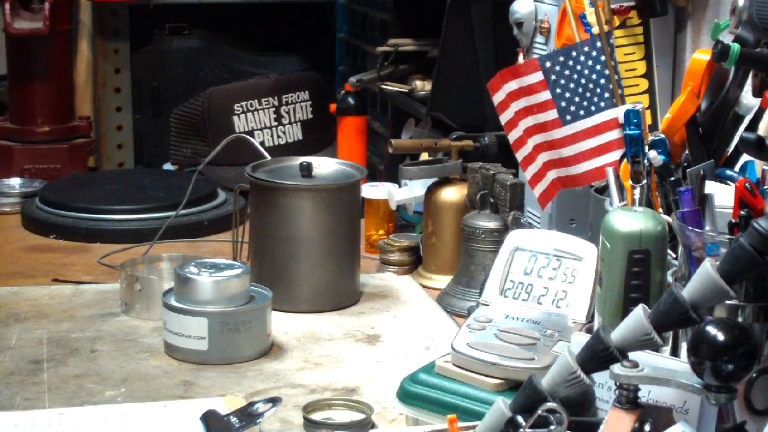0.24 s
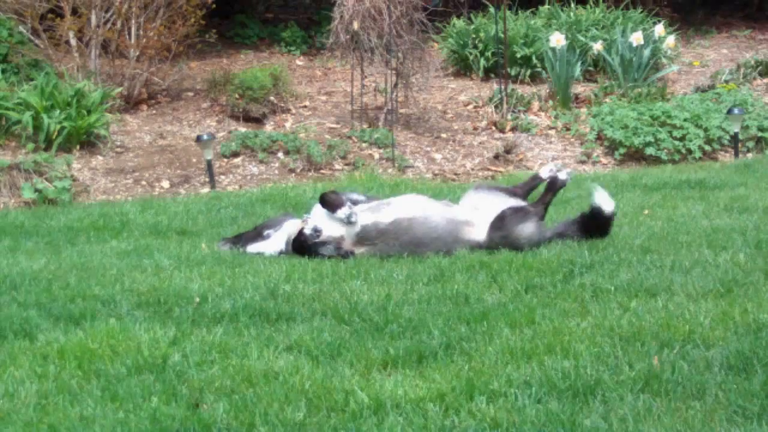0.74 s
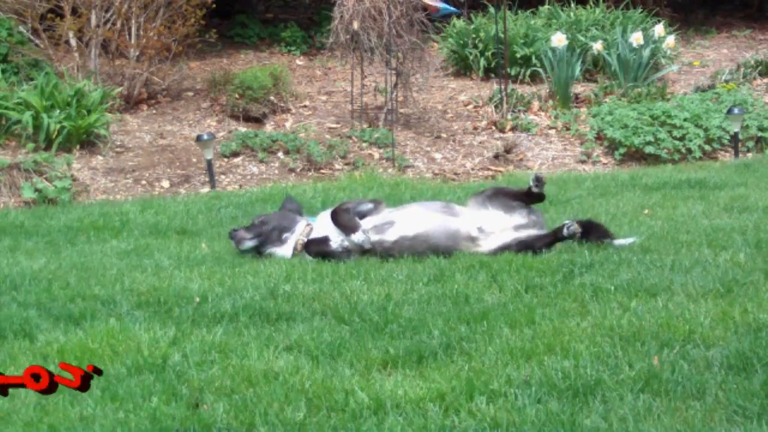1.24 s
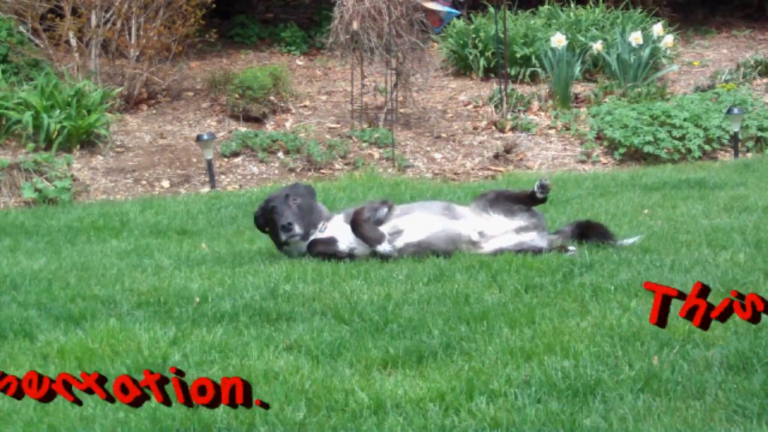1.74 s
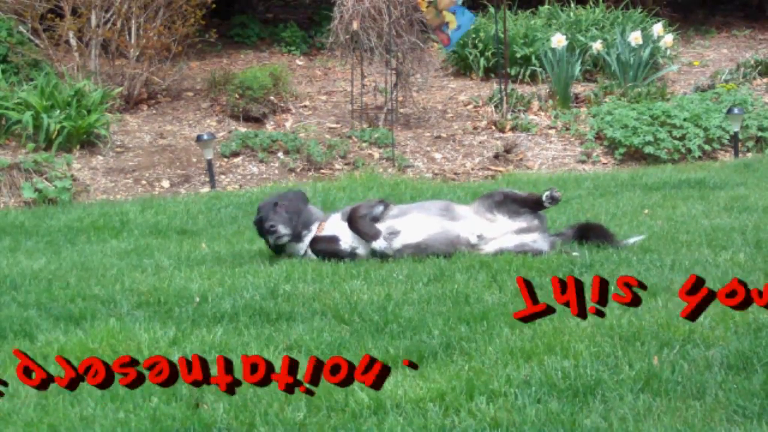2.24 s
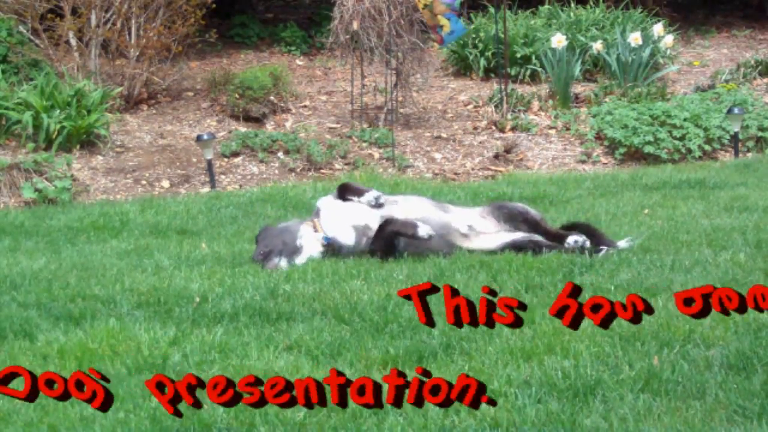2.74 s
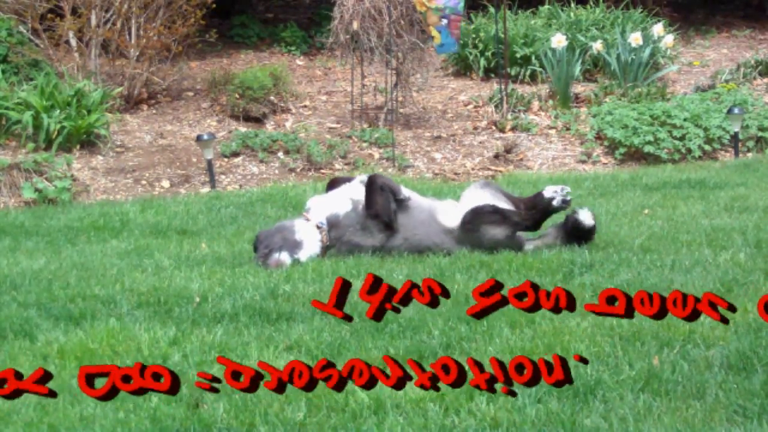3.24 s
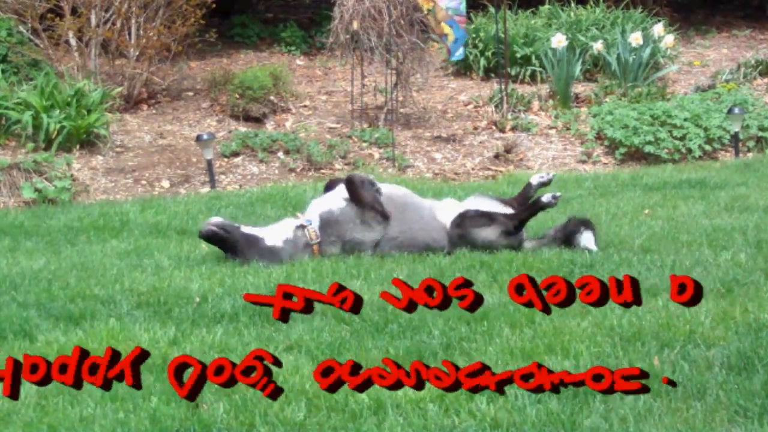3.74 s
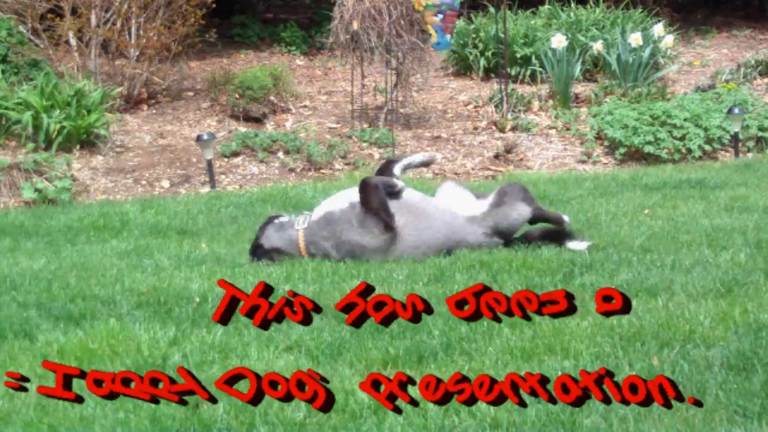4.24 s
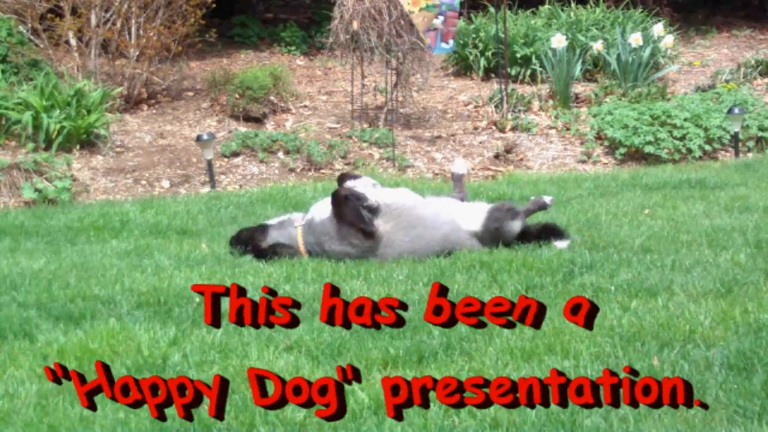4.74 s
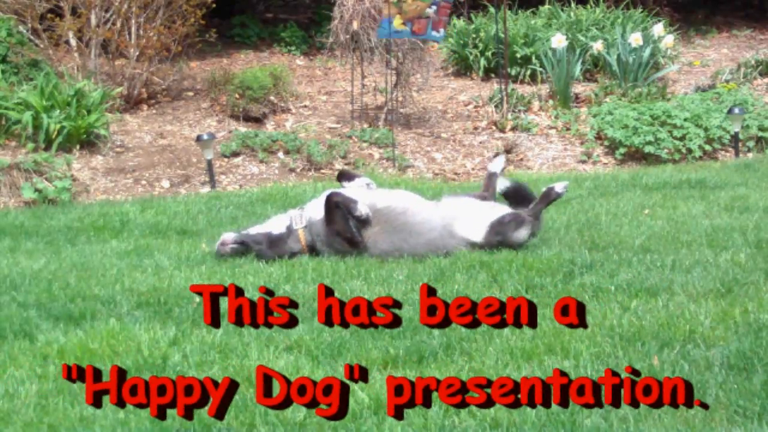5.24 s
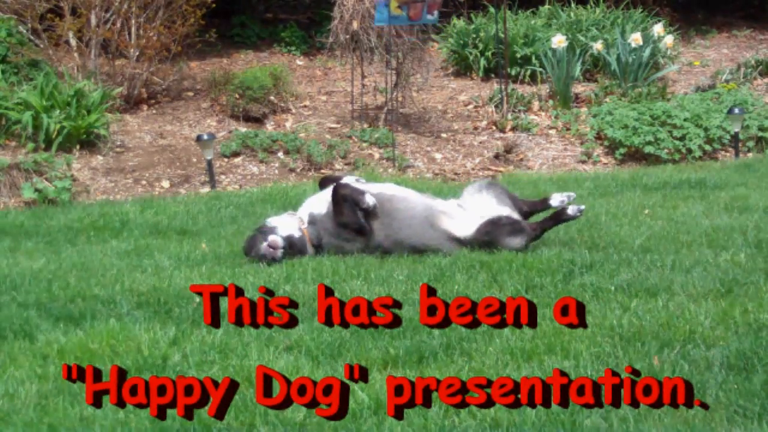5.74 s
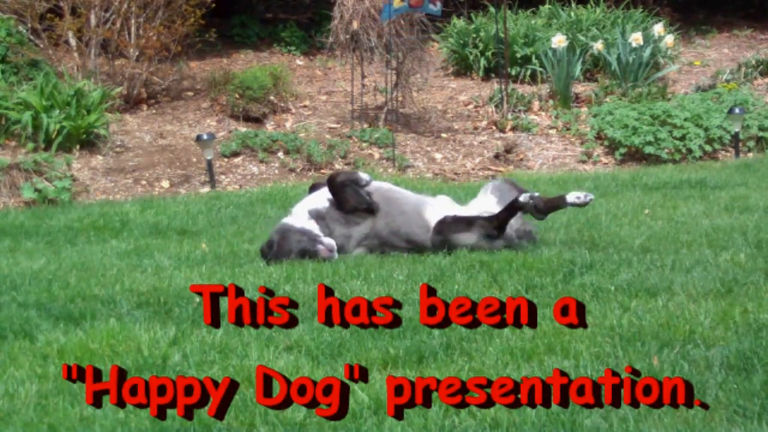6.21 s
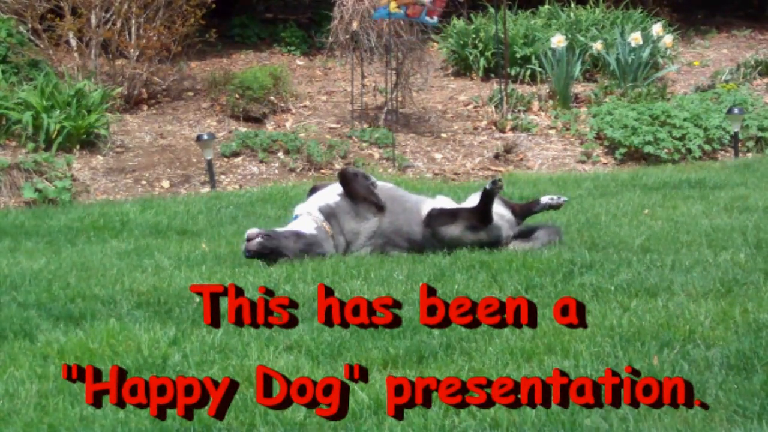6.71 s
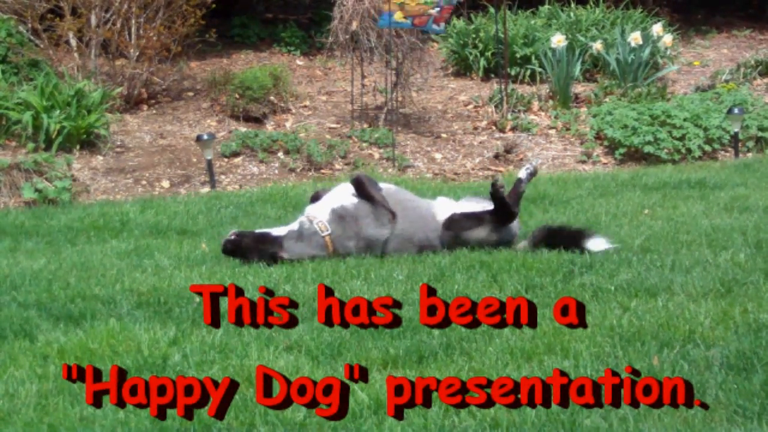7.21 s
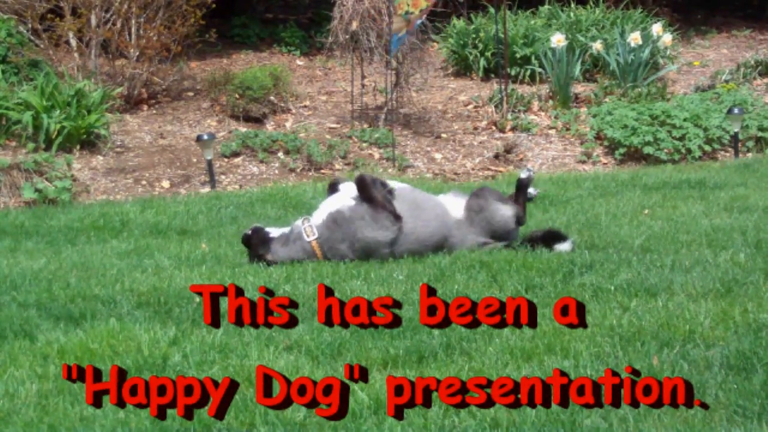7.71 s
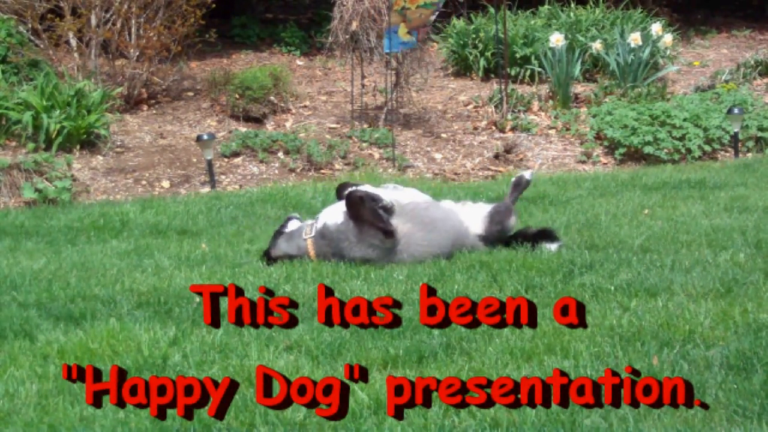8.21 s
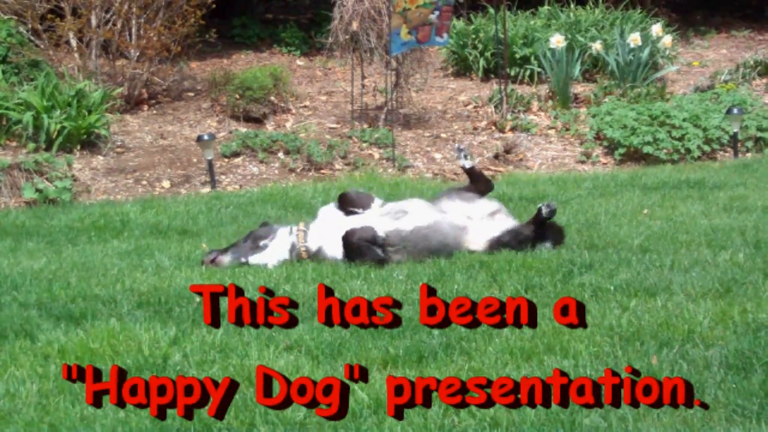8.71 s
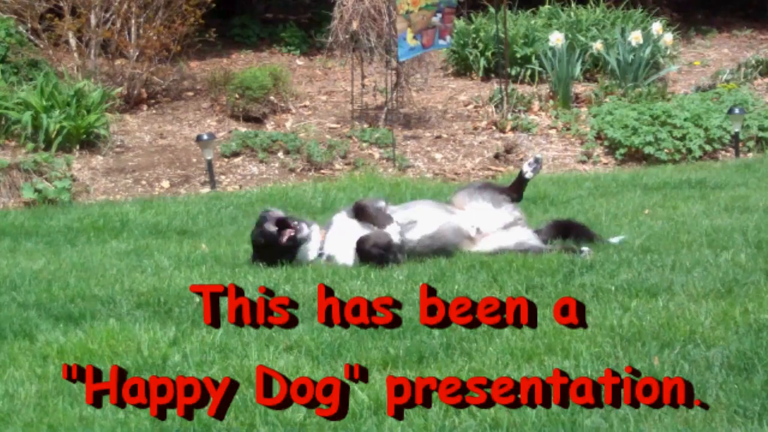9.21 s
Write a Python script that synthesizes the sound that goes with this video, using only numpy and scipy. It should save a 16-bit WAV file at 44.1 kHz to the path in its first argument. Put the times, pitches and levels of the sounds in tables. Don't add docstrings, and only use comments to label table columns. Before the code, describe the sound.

Indoors, a dull bass-heavy fan hum plays briefly in the centre. After a tiny gap and splutter the sound opens into wide stereo outdoors: many small songbirds, mostly near three kilohertz, gliding, chirping, scraping hoarsely and trilling in irregular overlapping bursts. Distant birds blur into a murmur, faint twig ticks come early, and diffuse reflections trail each call over a light bass-free hiss.

```python
import sys
import numpy as np
from scipy import signal
from scipy.fft import rfft, irfft, next_fast_len
from scipy.io import wavfile
from scipy.ndimage import uniform_filter1d

SR = 44100
rng = np.random.default_rng(int(sys.argv[2]) if len(sys.argv) > 2 else 0)


def nominal_scale(level):
    x = np.asarray(level, float) / 20
    return 10 ** x


def dump_mix(stems):
    frames = np.atleast_2d(stems).T
    limited = np.clip(frames, -1, 1)
    pcm = np.round(limited * 32767).astype(np.int16)
    wavfile.write(sys.argv[1], SR, pcm)


N = 417186
SHOP_END_S, GARDEN_START_S = .8429, .866


def wobble(rate_hz, size):
    hold = max(int(SR / rate_hz), 1)
    steps = np.repeat(rng.standard_normal(size // hold + 1), hold)
    return 1.252 * uniform_filter1d(steps, hold)[:size]


def sing(notes, rough, flutter_db, overtones_db, fade_s, half_db=-99, fall_db_s=0):
    out = np.zeros(N + SR)
    shake, flutter = wobble(900, N + SR), wobble(160, N + SR)
    for start_s, length_s, from_hz, middle_hz, to_hz, level_db in notes:
        edge = fade_s / length_s
        u = np.arange(-edge * length_s * SR / 2, (1 + edge / 2) * length_s * SR) / SR / length_s
        first = int((start_s - fade_s / 2) * SR)
        at = slice(first, first + len(u))
        hz = from_hz * (1 - u) * (1 - 2 * u) + 4 * middle_hz * u * (1 - u) + to_hz * u * (2 * u - 1)
        phase = 2 * np.pi * np.cumsum(hz * (1 + rough * shake[at])) / SR
        own = nominal_scale(flutter_db * (flutter[at][::-1] - flutter[at]))
        overtones = sum(nominal_scale(g) * np.sin((k + 2) * phase) for k, g in enumerate(overtones_db))
        tone = np.sin(phase) + own * overtones
        tone = tone + nominal_scale(half_db) * (np.sin(3 * phase / 2) + nominal_scale(-4) * np.sin(5 * phase / 2))
        ramp = np.clip(np.minimum(u + edge / 2, 1 + edge / 2 - u) / edge, 0, 1)
        fade = np.sin(np.pi / 2 * ramp) ** 2
        loudness = nominal_scale(level_db - fall_db_s * length_s * u + flutter_db * flutter[at])
        out[at] += np.sqrt(2) * loudness * fade * tone
    return out[:N]


def held(rows):
    sag = .012
    return [(s, length, hz * (1 + sag / 2), hz, hz * (1 - sag / 2), db) for s, length, hz, db in rows]


def slides(rows, halfway=.5):
    return [(s, length, a, a + halfway * (b - a), b, db) for s, length, a, b, db in rows]


def turns(rows):
    return [(s, length, ends, middle, ends, db) for s, length, ends, middle, db in rows]


def shaped(x, points):
    hz, db = np.transpose(points)
    size = next_fast_len(N)
    log_hz = np.log(np.arange(size // 2 + 1) * SR / size + 1)
    gain = nominal_scale(np.interp(log_hz, np.log(hz), db))
    return irfft(rfft(x, size) * gain, size)[..., :N]


def coloured(points):
    return shaped(rng.standard_normal(N), points)


def level(x, db):
    return x * nominal_scale(db) / np.sqrt(np.mean(x ** 2))


def pan(x, db):
    return x * nominal_scale(np.array([[db], [-db]]) / 2)


HALFWAY = {"clear": .45, "burry": .58, "near": .51}


def whistle(notes):
    return sing(notes, rough=0.0092, flutter_db=3.5, overtones_db=[-36, -33], fade_s=.018, fall_db_s=47)


# start_s, length_s, pitch_hz, level_db
LEFT_HELD = [(1.509, 0.064, 2966, -36.5), (1.63, 0.091, 2140, -51), (2.38, 0.023, 2425, -52),
             (2.94, 0.054, 2018, -52.5), (3.724, .022, 3177, -35.5), (3.777, 0.07, 3080, -40),
             (3.832, 0.045, 2655, -40), (3.92, .04, 2650, -48), (3.849, 0.13, 2197, -49.5),
             (4.195, .025, 3400, -45), (5.085, .045, 2237, -52), (7.025, 0.028, 2550, -52),
             (8.24, 0.21, 6900, -57), (9.03, 0.0655, 3154, -33), (9.177, 0.13, 1993, -52.5)]
# start_s, length_s, from_hz, to_hz, level_db
LEFT_SLIDES = [(.997, .057, 3520, 3240, -54.5), (1.078, .03, 3268, 3180, -36),
               (1.118, .03, 3200, 3120, -39), (1.482, .039, 2500, 2960, -37.5),
               (3.744, .034, 3169, 3050, -33.5), (3.777, .043, 2345, 2160, -49),
               (4.231, .048, 3402, 3200, -35), (4.942, .054, 3190, 2994, -41),
               (6.839, 0.027, 2927, 3175, -36.5), (6.977, .06, 2093, 2250, -48.5)]
# start_s, length_s, ends_hz, middle_hz, level_db
LEFT_TURNS = [(1.03, 0.044, 3380, 3300, -40), (4.9, .07, 2180, 2060, -58), (5.02, .11, 3100, 2973, -34)]


def left_whistler():
    return whistle(held(LEFT_HELD) + slides(LEFT_SLIDES, HALFWAY["clear"]) + turns(LEFT_TURNS))


# start_s, length_s, pitch_hz, level_db
RIGHT_HELD = [(2.23, 0.079, 4950, -57), (2.743, 0.027, 3213, -44), (2.775, 0.043, 2715, -52),
              (2.885, 0.027, 4383, -45), (2.932, 0.29, 6910, -57.5), (3.855, 0.075, 3120, -61),
              (7.17, .075, 2897, -39.5), (7.247, 0.031, 2990, -50), (8.14, 0.036, 4400, -50),
              (8.182, 0.065, 6850, -60)]
# start_s, length_s, from_hz, to_hz, level_db
RIGHT_SLIDES = [(5.211, .045, 4480, 4700, -57), (5.256, 0.04, 4780, 4945, -47.5),
                (6.868, 0.053, 3390, 3176, -42.5), (7.145, .03, 2650, 2850, -39.5),
                (8.753, .025, 3070, 3340, -46), (8.785, .06, 3600, 2800, -45.5),
                (8.845, 0.16, 2740, 2896, -51)]
# start_s, length_s, ends_hz, middle_hz, level_db
RIGHT_TURNS = [(5.998, 0.0666, 3180, 3353, -42.5)]


def right_whistler():
    return whistle(held(RIGHT_HELD) + slides(RIGHT_SLIDES, HALFWAY["clear"]) + turns(RIGHT_TURNS))


# start_s, length_s, pitch_hz, level_db
BURRY_HELD = [(1.35, .08, 2240, -60), (1.75, .015, 2570, -50), (2.67, .15, 2650, -59),
              (2.6, .045, 2080, -57), (4.75, .04, 3050, -55), (4.68, .02, 3050, -57),
              (4.73, .06, 3870, -62), (6.82, .15, 2130, -55), (6.88, .05, 3950, -59),
              (7.265, .09, 3680, -60), (8.12, .1, 2130, -62), (5.22, .14, 3000, -55),
              (5.345, .05, 2130, -60), (2.5, .03, 3250, -53), (8.72, .05, 4150, -62),
              (8.815, .05, 4750, -62), (1.205, .035, 3250, -53), (4.885, .07, 2200, -56),
              (4.89, .06, 2500, -57), (6.1, .03, 2130, -57), (6.16, .05, 3680, -60), (2.33, .1, 2400, -56),
              (1.508, 0.071, 2714, -44), (1.65, 0.048, 3280, -51.5), (3.04, 0.084, 3086, -55),
              (3.135, 0.036, 3710, -56.5), (7.725, .04, 3400, -48.5), (7.79, .1, 3137, -54.5),
              (8.095, 0.05, 3144, -52), (8.306, 0.079, 3050, -52.5), (8.4, 0.055, 2595, -53),
              (8.985, .03, 2060, -54)]
# start_s, length_s, from_hz, to_hz, level_db
BURRY_FALLS = [(1.547, .041, 3070, 2644, -37), (2.5, 0.05, 3480, 2960, -55), (2.56, 0.03, 2260, 1950, -57),
               (4.225, 0.062, 3284, 2700, -38.5), (4.271, 0.075, 3340, 2832, -33.5),
               (4.372, .045, 2620, 2480, -39), (4.415, .05, 2450, 2050, -46), (4.325, .06, 3250, 2800, -41),
               (8.885, .12, 2280, 2150, -56), (9.11, .06, 3050, 2400, -50), (8.4, .03, 4600, 4400, -62),
               (8.505, .035, 4600, 4250, -63), (6.055, .075, 3250, 2350, -43), (6.08, .04, 3250, 2750, -44),
               (6.119, .06, 2978, 2400, -47.5), (6.189, 0.05, 2810, 2377, -48.5),
               (6.86, .074, 3000, 2476, -38.5), (9.075, 0.059, 3000, 2265, -40)]
# start_s, length_s, from_hz, to_hz, level_db
BURRY_RISES = [(1.462, .04, 2330, 2950, -52), (2.71, .03, 2750, 3150, -50), (5.63, .05, 2350, 2490, -54),
               (6.678, 0.085, 2310, 2630, -55), (6.815, .04, 2400, 3090, -39), (6.8, .06, 2400, 3300, -50),
               (9.11, .06, 4100, 4600, -61), (6.876, .04, 2700, 3120, -37.5),
               (8.3, .074, 3400, 3716, -50.5)]
# start_s, length_s, ends_hz, middle_hz, level_db
BURRY_TURNS = [(1.438, .07, 2550, 2030, -49), (1.58, .09, 2300, 2020, -54), (1.185, .07, 2150, 1780, -60)]


def burry_whistler():
    notes = held(BURRY_HELD) + slides(BURRY_FALLS + BURRY_RISES, HALFWAY["burry"]) + turns(BURRY_TURNS)
    return sing(notes, rough=0.014, flutter_db=3.5, overtones_db=[-36, -33], fade_s=0.011, fall_db_s=29)


# start_s from the crest, length_s, from_hz, to_hz, level_db against the phrase
WARBLE_SLIDES = [
    (-.065, .07, 3600, 4750, -1),
    (.004, 0.014, 4700, 3730, 1),
    (.02, .016, 3490, 4120, 0),
]
# start_s from the crest, length_s, ends_hz, middle_hz, level_db against the phrase
WARBLE_HOP = (.052, .036, 3250, 4350, 1.8)
# crest_s, level_db
WARBLES = [
    (3.388, -63),
    (8.268, -60),
]


def warbler():
    phrase = np.array(slides(WARBLE_SLIDES, .6) + turns([WARBLE_HOP]))
    return [tuple(note) for s, db in WARBLES for note in phrase + [s, 0, 0, 0, 0, db]]


# start_s, length_s, pitch_hz, level_db
NEAR_HELD = [(1.692, .032, 2540, -43.5), (4.988, .028, 3120, -46), (6.982, 0.044, 2816, -40.5),
             (7.6, 0.032, 2660, -55), (7.655, 0.011, 4860, -53.5), (7.79, 0.018, 2890, -52),
             (7.518, .016, 4955, -48), (7.565, .03, 4900, -62), (7.548, .013, 3350, -45),
             (7.3, .08, 2280, -59), (7.35, .065, 3150, -57.5), (7.48, 0.027, 3230, -53.5),
             (7.527, .012, 2700, -53), (7.568, .015, 2620, -53), (7.835, .055, 2800, -56.5),
             (3.335, 0.036, 3230, -60), (3.325, 0.034, 2750, -62), (3.49, 0.048, 3250, -60.5),
             (3.53, .03, 3100, -61.5), (3.2, .03, 2620, -62), (6.25, .07, 1950, -62),
             (6.626, .038, 2190, -56), (5.6, 0.018, 2430, -50), (5.77, 0.046, 2880, -54),
             (5.8, 0.028, 3800, -61.5), (5.855, 0.028, 3780, -61), (5.96, 0.032, 3760, -58.5),
             (2.3, 0.045, 3230, -53), (9.417, 0.035, 2700, -46)]
# start_s, length_s, from_hz, to_hz, level_db
NEAR_FALLS = [(2.04, .025, 3450, 3150, -54), (2.075, .04, 3000, 2750, -56), (2.655, .03, 3050, 2950, -51),
              (2.95, .025, 2750, 2500, -57), (4.548, .027, 2850, 2700, -47),
              (4.465, 0.048, 2900, 2570, -52), (4.856, 0.026, 2600, 2470, -42),
              (7.403, .008, 4320, 3300, -52), (7.508, .012, 5700, 5030, -55),
              (7.595, 0.0088, 3680, 3100, -52), (7.638, .012, 3000, 2500, -55),
              (7.779, .012, 4900, 3400, -58), (6.611, 0.011, 2650, 2350, -52),
              (6.75, 0.046, 2500, 2066, -58), (5.7, 0.067, 3230, 2900, -52), (5.087, .018, 2950, 2300, -47),
              (5.075, .025, 2550, 2200, -53), (6.545, 0.032, 3560, 3100, -53),
              (6.576, .013, 3050, 2620, -44), (7.015, 0.031, 2750, 2420, -42.5),
              (7.58, 0.015, 3680, 2780, -49), (7.61, 0.071, 2300, 1960, -59.5),
              (7.668, 0.0087, 3540, 2790, -46), (7.673, 0.027, 4810, 2510, -53.5),
              (7.872, .019, 4830, 2850, -53), (7.884, 0.016, 4600, 2780, -54.5),
              (8.2, 0.024, 2700, 2500, -56.5), (9.318, 0.071, 2950, 2566, -46),
              (9.39, 0.014, 2490, 1930, -52)]
# start_s, length_s, from_hz, to_hz, level_db
NEAR_RISES = [(3.282, .043, 2496, 3280, -59), (3.65, .012, 3820, 5400, -60),
              (4.832, 0.024, 2400, 2550, -53), (1.3, .035, 2760, 3100, -57), (1.165, .035, 3120, 3450, -54),
              (6.473, .015, 2800, 3400, -52), (7.71, .04, 3150, 3450, -54.5),
              (2.463, 0.021, 2830, 3480, -52), (5.151, 0.048, 2560, 2850, -45.5),
              (5.487, 0.041, 2540, 2736, -46.5), (7.69, .028, 2450, 2680, -54.5),
              (7.756, .02, 4460, 4970, -60), (9.027, 0.012, 2623, 3240, -42)]
# start_s, length_s, ends_hz, middle_hz, level_db
NEAR_TURNS = [(5.922, 0.048, 3460, 3294, -41.5), (6.062, 0.022, 4250, 4470, -59.5),
              (6.965, .03, 3450, 3720, -55), (7.133, .025, 3450, 3680, -57), (1.22, .08, 2760, 2430, -55),
              (1.84, .045, 3080, 2900, -53), (5.03, 0.035, 2830, 2665, -42.5),
              (5.548, 0.044, 2607, 3073, -40), (6.587, 0.027, 2620, 3130, -43),
              (6.522, .046, 1880, 2020, -57)]
# start_s, length_s, from_hz, to_hz, level_db
SWOOPS = [(1.083, .03, 3000, 1880, -53), (1.104, .012, 3050, 2250, -48), (1.147, .036, 2850, 1760, -57),
          (4.987, .045, 3350, 2640, -47)]


def near_birds():
    notes = held(NEAR_HELD) + slides(NEAR_FALLS + NEAR_RISES, HALFWAY["near"]) + turns(NEAR_TURNS)
    notes += warbler() + slides(SWOOPS, 0.78)
    return sing(notes, rough=0.0025, flutter_db=2.5, overtones_db=[-36, -38], fade_s=.01)


# start_s, length_s, pitch_hz, level_db
SQUEAKS = [(2.095, .13, 3675, -50), (2.83, 0.078, 3280, -56), (4.8, 0.078, 3620, -56.5),
           (5.469, 0.11, 3650, -53.5), (7.37, 0.141, 3573, -47.5), (8.069, 0.1, 3500, -59),
           (9.06, 0.066, 3280, -52)]
# start_s, length_s, pitch_hz, level_db
SQUEAK_TAILS = [(2.22, 0.084, 3480, -61), (7.51, 0.081, 3570, -60)]
# start_s, length_s, from_hz, to_hz, level_db
SCRAPES = [(2.1, .05, 5040, 4810, -59), (2.24, 0.038, 5000, 5000, -52), (2.875, .04, 5200, 4520, -56),
           (3.69, .059, 3850, 3840, -55.5), (4.795, 0.031, 5100, 4400, -46), (4.82, 0.074, 4350, 4570, -49),
           (4.835, .045, 4950, 5050, -53), (5.21, 0.09, 4810, 4910, -58.5), (5.455, 0.048, 5750, 6100, -56),
           (6.175, .08, 5600, 5850, -58), (2.14, .09, 6900, 7000, -55), (7.4, .11, 6900, 7000, -52),
           (5.5, .1, 7350, 7300, -56), (7.335, .04, 5050, 5300, -55), (1.425, .04, 5750, 5350, -66),
           (5.53, 0.093, 5260, 4780, -54.5), (5.62, .06, 4750, 5000, -48.5), (5.61, .05, 3650, 3800, -52.5),
           (6.24, 0.019, 5200, 4400, -49), (6.258, .025, 4400, 4220, -48.5), (6.285, .025, 5600, 4200, -51),
           (6.295, .04, 3600, 3600, -46.5), (6.34, 0.024, 3350, 3570, -49), (6.677, 0.016, 5200, 4300, -56),
           (6.7, .025, 4550, 3900, -56), (2.125, .015, 3700, 3700, -53), (2.15, .03, 3700, 3690, -56),
           (2.262, 0.039, 3750, 3780, -53), (7.31, 0.053, 4700, 4640, -52.5), (3.5, .03, 4550, 4470, -60),
           (3.61, .035, 4600, 4450, -58), (7.38, 0.05, 5000, 4510, -52.5), (8.12, 0.063, 4910, 4430, -52)]
# start_s, length_s, pitch_hz, level_db
RASPS = [(2.097, .13, 5800, -54), (2.225, .08, 5900, -57), (4.8, .09, 5200, -57), (5.48, .11, 6400, -54),
         (5.6, .11, 4700, -52), (6.225, .13, 4900, -52), (6.215, .2, 6900, -58), (7.37, .09, 5300, -50)]
# start_s, length_s, pitch_hz, level_db
RINGS = [(3.02, 0.15, 6330, -61.5), (5.96, 0.069, 5320, -62), (6.22, 0.21, 8080, -57),
         (8.19, .27, 6350, -60.5), (8.24, .15, 9550, -68), (8.105, 0.043, 8600, -58),
         (6.235, .04, 11500, -60), (6.28, .14, 10900, -60), (5.58, .11, 10900, -61), (2.11, .09, 9500, -62),
         (2.24, .045, 9900, -63), (7.31, .16, 9150, -63)]
# freq_hz, gain_db
THROAT = [(2500, -0.5), (4000, 0.1), (6000, -1.5), (7900, 0.1), (8400, -9), (9600, -5), (11200, -2),
          (12500, -13.5)]


def rusty():
    scoop, scoop_s = .72, .035
    notes = slides([(s, scoop_s, scoop * hz, hz, db - 2.0) for s, length, hz, db in SQUEAKS], .7)
    notes += held([(s + scoop_s, length - scoop_s, hz, db) for s, length, hz, db in SQUEAKS])
    notes += held(SQUEAK_TAILS)
    squeaks = sing(notes, rough=.05, flutter_db=3, overtones_db=[0.5, -4], fade_s=.025, half_db=-3)
    scrapes = sing(slides(SCRAPES), rough=.028, flutter_db=3.5, overtones_db=[-14], fade_s=0.0091)
    rasps = sing(held(RASPS), rough=.13, flutter_db=4.5, overtones_db=[-12], fade_s=.02)
    rings = sing(held(RINGS), rough=0.018, flutter_db=0.5, overtones_db=[], fade_s=0.022)
    chop = nominal_scale(3.5 * wobble(110, N) - 1)
    return shaped(chop * (squeaks + rasps) + scrapes, THROAT) + rings


# start_s, period_s, repeats, level_db
TRILLS = [(3.263, 0.099, 5.9, -58), (4.405, 0.099, 8, -58), (7.615, .103, 5.5, -58.5),
          (8.14, 0.108, 4.1, -58)]
# place in the period (0-1), length_s, from_hz, to_hz, level_db against the phrase
TRILL_SHAPE = [
    (.01, 0.013, 4950, 5450, 1),
    (0.303, 0.019, 5900, 7380, -6),
    (.52, .012, 5030, 5430, -7.5),
]
# start_s, period_s, repeats, level_db
PIPS = [(1.11, .066, 5.5, -64), (1.59, 0.063, 4.5, -60)]


def triller():
    notes = []
    for start_s, period_s, repeats, db in TRILLS:
        for k in range(int(repeats)):
            notes += [(start_s + (k + place) * period_s, length_s, from_hz, to_hz, db + gain_db)
                      for place, length_s, from_hz, to_hz, gain_db in TRILL_SHAPE]
    for start_s, period_s, repeats, db in PIPS:
        notes += [(start_s + k * period_s, 0.012, 4750, 4500, db) for k in range(int(repeats))]
    uneven = [.002, 0, 0, 0, 0, 2]
    notes = np.array(slides(notes, 0.65)) + uneven * rng.standard_normal((len(notes), 6))
    return sing(notes, rough=0.0061, flutter_db=1.0, overtones_db=[-25], fade_s=0.0072)


# start_s, peak_db
TICKS = [(1.1862, -49), (1.2945, -55), (2.3794, -53)]


def twigs():
    out = np.zeros(N)
    for start_s, peak_db in TICKS:
        first = int(start_s * SR)
        out[first:first + 88] = nominal_scale(peak_db) * rng.standard_normal(88) * np.exp(-np.arange(88) / 18.0)
    return np.diff(out, prepend=0)


# time_s, level_db
FLOCK = [(.87, -62.5), (1.3, -58), (1.95, -61), (2.6, -53.5), (3.5, -66), (4.1, -62), (5.5, -57),
         (5.9, -60.5), (6.4, -52.5), (6.7, -56), (7.6, -57.5), (8.6, -60), (9.46, -56)]


def flock(per_s, centre_hz, gain_db, length_s):
    chance = rng.standard_normal((int(9 * per_s), 5)).T
    s = np.linspace(.7, 9.4, chance.shape[1]) + .03 * chance[0]
    hz = centre_hz * np.exp(.115 * 1.5 * np.tanh(chance[1] / 1.5))
    db = np.interp(s, *np.transpose(FLOCK)) + gain_db + 2.6 * chance[4]
    from_hz, to_hz = hz * (1 + .09 * chance[2]), hz * (1 + 0.101 * chance[3])
    notes = np.transpose([s, length_s + 0 * s, from_hz, hz, to_hz, db])
    return sing(notes, rough=0.011, flutter_db=3.5, overtones_db=[-22], fade_s=.6 * length_s)


# delay_s, level_db
ECHOES = [(.012, -5.5), (.024, -4), (.052, -6.5), (.079, -11.5)]


def garden(x):
    t = np.arange(SR) / SR
    noise = rng.standard_normal((2, SR))
    low = signal.sosfiltfilt(signal.butter(2, 5600, fs=SR, output="sos"), noise)
    low_t60_s, treble_t60_s = 0.85, .3
    fading = low * nominal_scale(-60 * t / low_t60_s) + (noise - low) * nominal_scale(-60 * t / treble_t60_s)
    shared, apart = fading * np.clip(t / 0.031, 0, 1)
    tail = shared + nominal_scale(-4.0) * apart * np.array([[1], [-1]])
    tail = tail * nominal_scale(-6) / np.sqrt(np.sum(tail ** 2, axis=1, keepdims=True))
    for delay_s, db in ECHOES:
        tail[[0, 1], int(SR * delay_s) + np.array([0, 2])] += nominal_scale(db)
    return signal.fftconvolve(x[None], tail, axes=1)[:, :N]


# freq_hz, level_db per Hz
AIR = [(90, -45.5), (500, -25.5), (1000, -14), (2900, -8.5), (4600, -11), (7800, -18.5), (11400, -17),
       (15800, -22.5)]
# freq_hz, side minus mid in dB
AIR_SIDE = [(100, -1), (1000, -3), (3000, -5.5), (9000, 0)]


def air():
    hz = np.array(AIR)[:, 0]
    width_hz, width_db = np.transpose(AIR_SIDE)
    side_db = np.interp(np.log(hz), np.log(width_hz), width_db)
    side = coloured(np.array(AIR) + np.transpose([0 * hz, side_db]))
    both = coloured(AIR) + side * np.array([[1], [-1]])
    return level(both, -57) * nominal_scale(0.21 * wobble(3, N))


# freq_hz, level_db
FAN_LINES = [(26.9, -51.5), (59.2, -55), (177.6, -67), (209.9, -71), (269.2, -74.5), (360.7, -74.5)]
# freq_hz, level_db per Hz
SHOP = [(8.8, -41), (15, 3), (67, -9.5), (138, -18), (238, -25), (1830, -33), (5860, -35.5), (7200, -43.5)]


def workshop():
    t = np.arange(N) / SR
    lines = np.zeros(N)
    for hz, db in FAN_LINES:
        loudness = np.sqrt(2) * nominal_scale(db + 1.5 * wobble(9, N))
        lines += loudness * np.sin(2 * np.pi * hz * t + 0.38 * wobble(6.8, N))
    low = signal.ellip(10, .2, 70, 7250, fs=SR, output="sos")
    return signal.sosfilt(low, lines + level(coloured(SHOP), -45 - 3.5))


def splutter(t):
    ripple = -np.cos(2 * np.pi * 3000 * t * np.exp(-np.abs(t) / 0.005))
    return nominal_scale(-40) * np.exp(-np.abs(t) / 0.0026) * ripple


def microphone(x):
    bent = x + 1.5 * (x ** 2 + 13 * x ** 3)
    return shaped(bent, [(60, -55), (400, -20), (1500, -5.5), (2200, 1.43)])


PERCH_PAN_DB = [4.5, -13, 1]


def scene():
    left, right, burry = left_whistler(), right_whistler(), burry_whistler()
    near, hoarse = near_birds(), rusty()
    ticking = triller() + twigs()
    far = flock(90, 2850, -7.5, .045) + flock(30, 4700, -15, .025)
    direct = sum(pan(x, db) for x, db in zip([left, right, burry], PERCH_PAN_DB))
    direct = direct + pan(hoarse + ticking, -.8) + pan(nominal_scale(4.5) * near, -2.4)
    to_trees = nominal_scale(-2.5) * (left + right) + burry + nominal_scale(-1.0) * hoarse + nominal_scale(-2.0) * ticking
    to_trees = to_trees + nominal_scale(-3.5) * near + nominal_scale(2) * far
    outside = microphone(nominal_scale(-3) * (direct + garden(to_trees)) + nominal_scale(-20.5) * far)
    t = np.arange(N) / SR - GARDEN_START_S
    outside = outside + pan(air(), -1.1) * nominal_scale(-5 * np.exp(-np.abs(t) / 0.58))
    inside = workshop() * (t < SHOP_END_S - GARDEN_START_S)
    return inside + (outside + splutter(t)) * (t >= 0)


def roll_off(x):
    return signal.sosfilt(signal.butter(12, 15930, fs=SR, output="sos"), x)


def record(dry):
    return roll_off(dry)


dry = scene()
out = record(dry)
dump_mix(out)
```